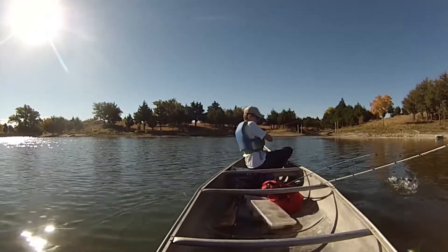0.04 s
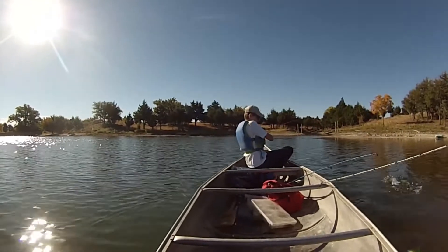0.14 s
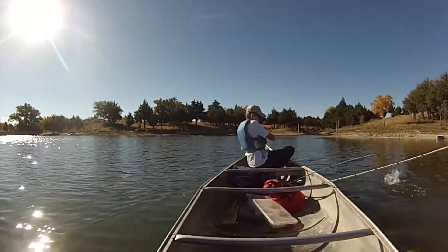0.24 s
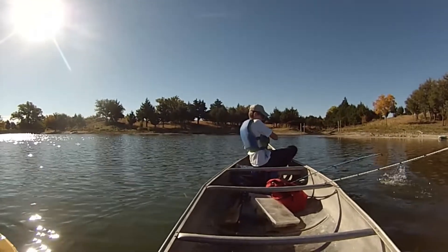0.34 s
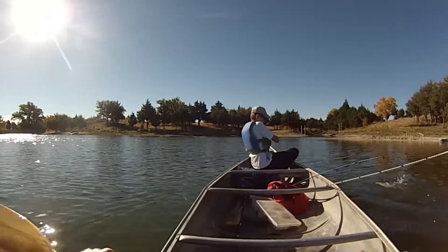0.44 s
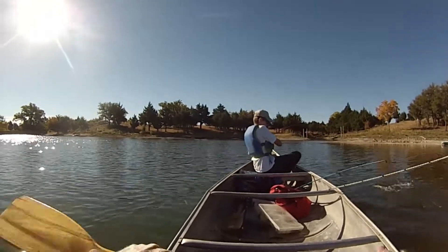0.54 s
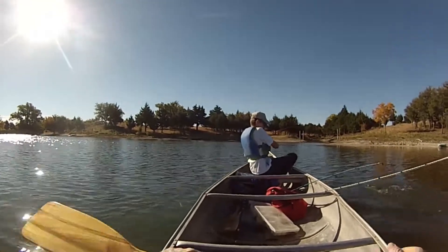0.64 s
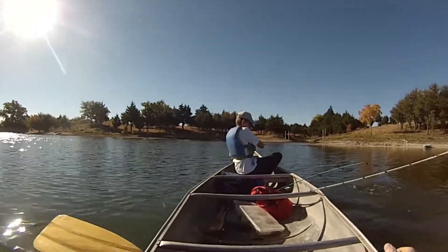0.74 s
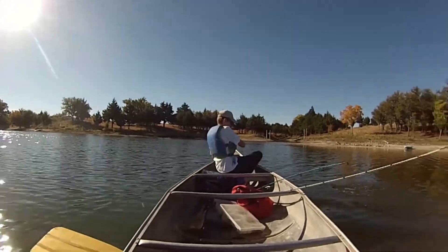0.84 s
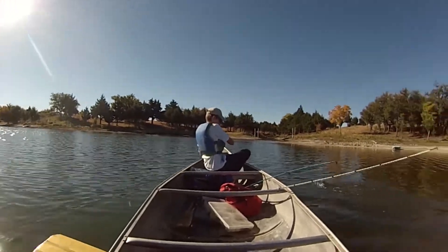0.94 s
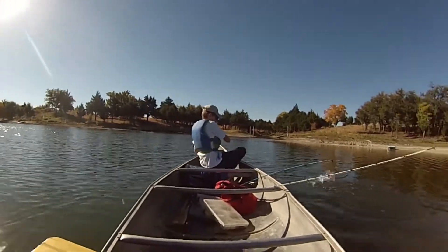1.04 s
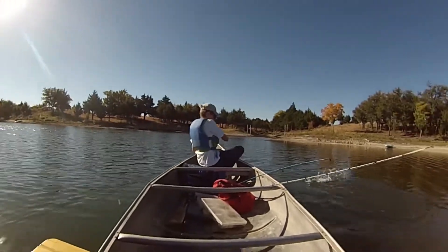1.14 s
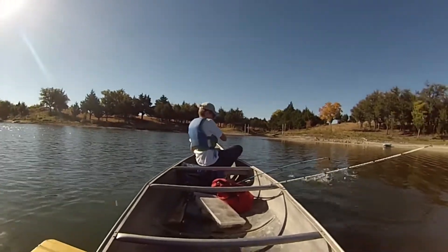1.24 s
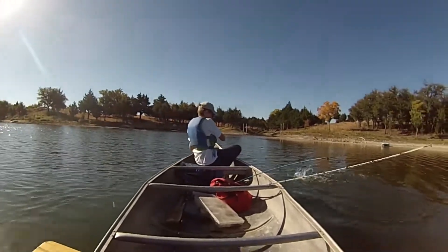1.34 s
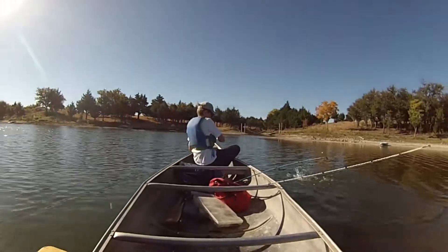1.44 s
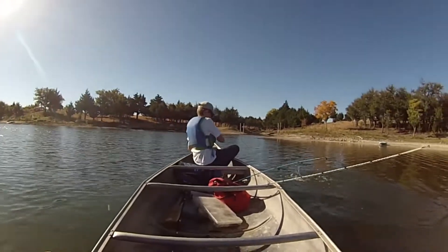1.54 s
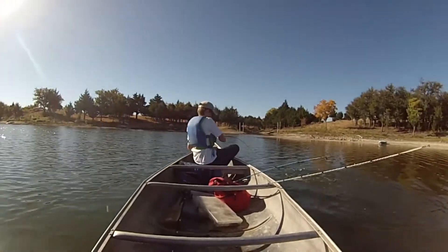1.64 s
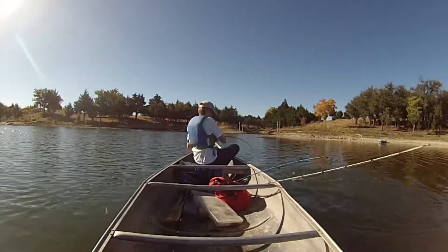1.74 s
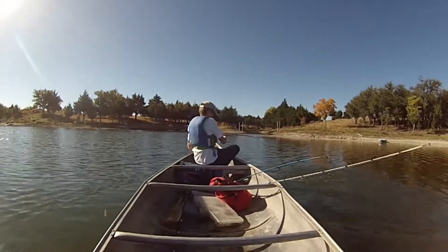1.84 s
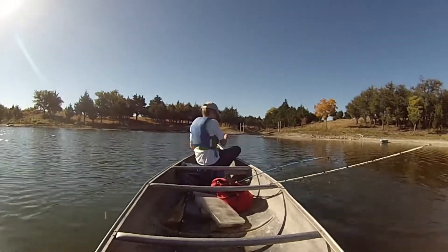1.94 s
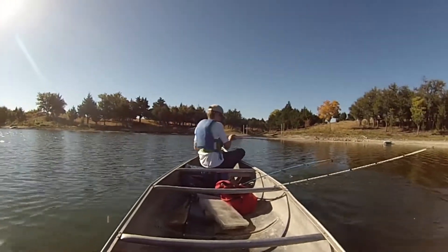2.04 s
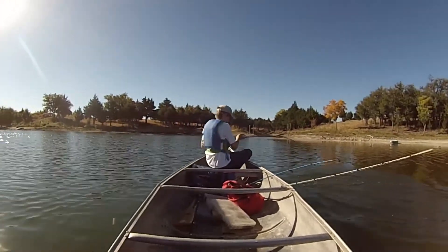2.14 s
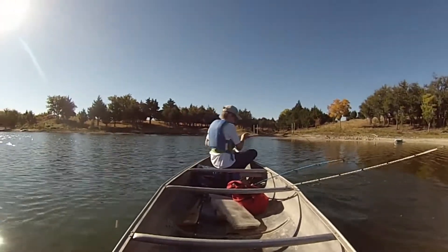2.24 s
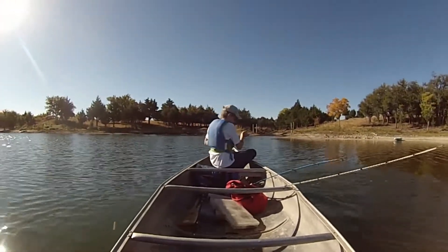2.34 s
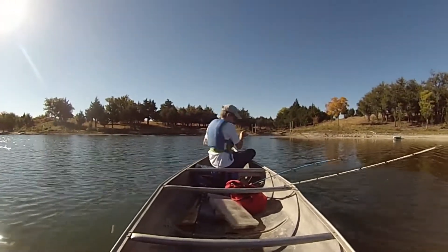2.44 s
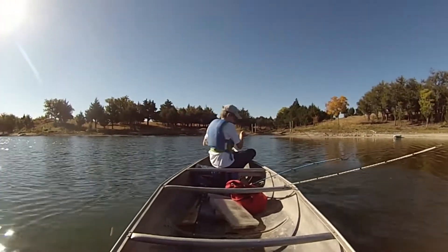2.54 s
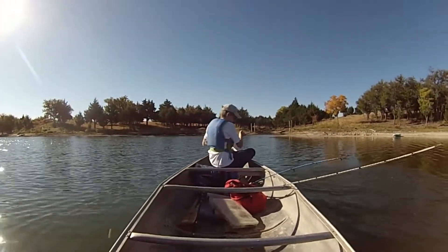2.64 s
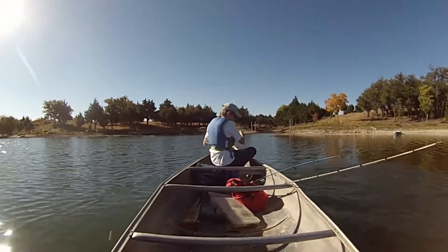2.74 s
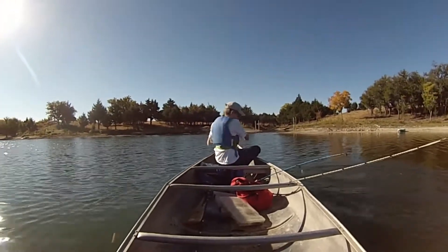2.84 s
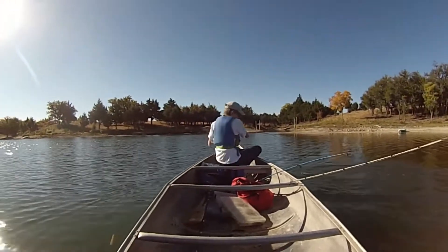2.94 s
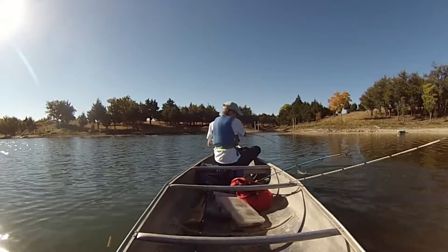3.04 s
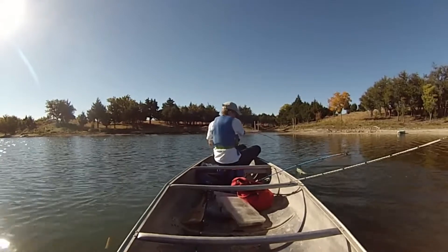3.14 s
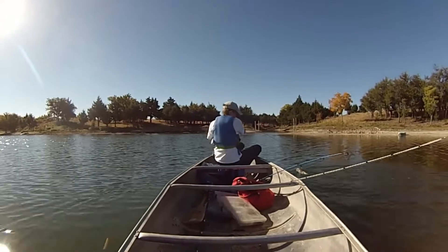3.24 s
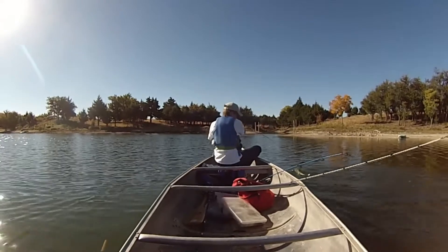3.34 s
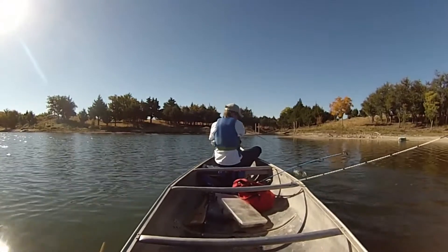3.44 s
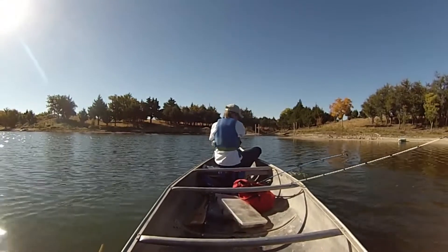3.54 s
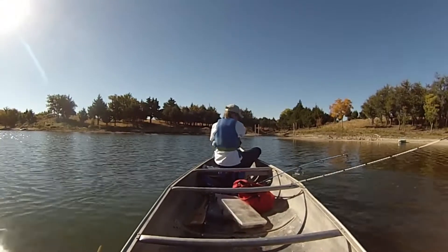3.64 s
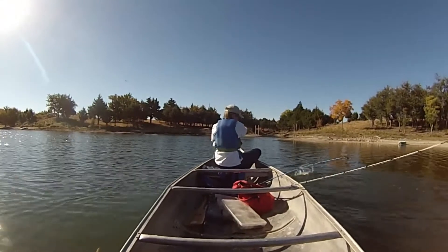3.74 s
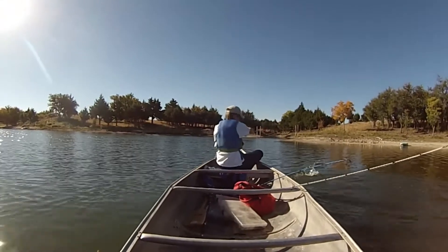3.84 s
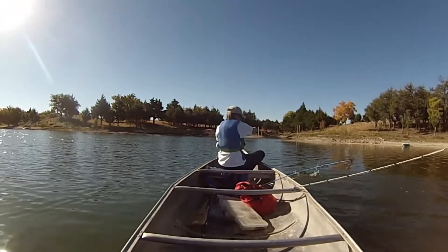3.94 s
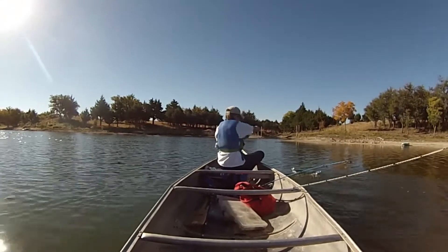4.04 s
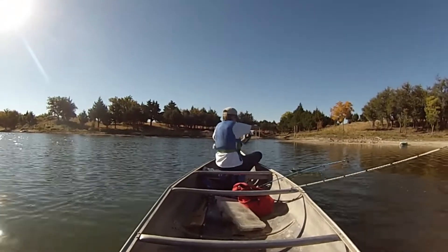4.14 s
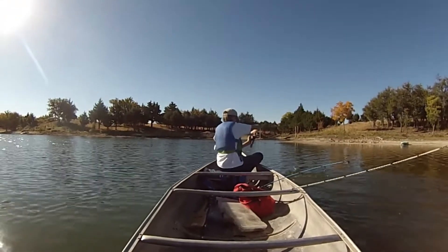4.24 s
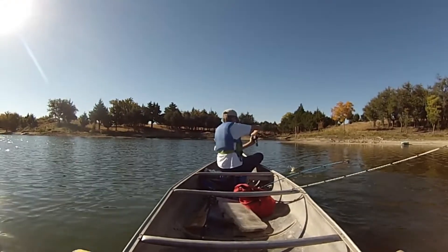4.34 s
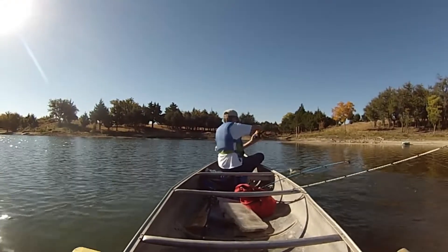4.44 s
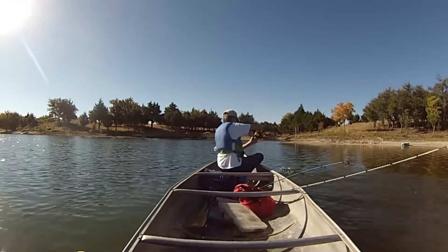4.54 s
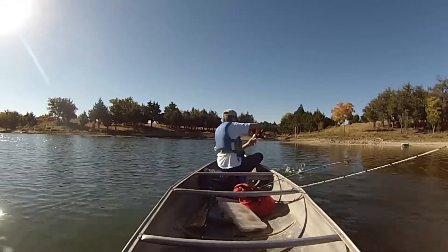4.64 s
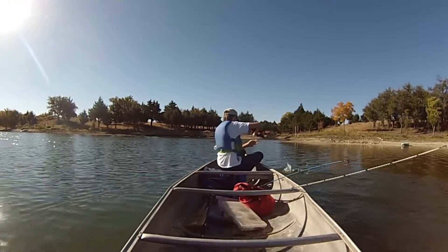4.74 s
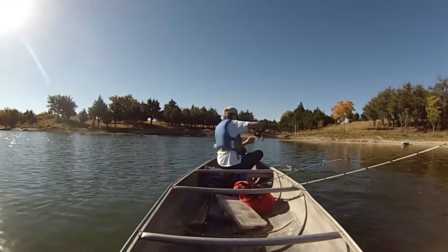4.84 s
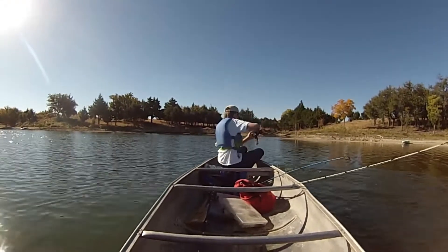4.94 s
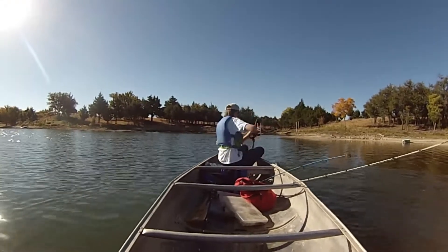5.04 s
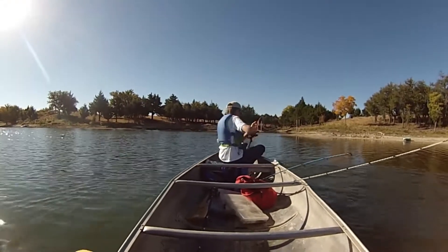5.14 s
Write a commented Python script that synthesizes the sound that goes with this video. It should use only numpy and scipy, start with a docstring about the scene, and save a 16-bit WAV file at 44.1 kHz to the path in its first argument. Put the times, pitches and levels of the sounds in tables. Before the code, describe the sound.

A hooked fish thrashes close by at the surface of a calm lake, beside a metal canoe. From 0 to about 1.6 s the splashing is dense: patchy spray, crisp ticks, plinking drops and gurgling bubbles, with a prominent hollow gulp near 1.15 s. Strong gusts overload the small microphone as deep lumpy thumps, heaviest between 0.6 and 1.1 s. A soft hull knock at 1.26 s precedes a hard, briefly ringing one at 1.6 s. A snappy plop comes at 1.9 s, then mostly faint lapping, sparse drips and low wind bumps, notably around 2.4 s. From 3.1 s small splashes return, growing after 3.4 s with rising bubbles and a bright snap near 3.77 s. Wind bumps return at 4.3 and 4.65 s; hull knocks sound around 4.55 and 4.78 s among renewed splashes. The sound is mono, dry and slightly boxy, over a faint steady wash.

```python
"""Calm lake, beside a sheet-metal canoe: a hooked fish thrashes at the surface.
Noise and damped sines make its spray, droplets, ticks and gulping bubbles; a late copy comes off the water.
Knocks ring the hull as decaying modes and noise. Gusts buffet the small camera's single microphone as
low noise and single pressure swings. The microphone sits in a housing; a faint wash lies underneath."""
import sys
import numpy as np
from scipy import signal
from scipy.fft import rfft, irfft, next_fast_len
from scipy.io import wavfile
from scipy.ndimage import uniform_filter1d, map_coordinates

SR = 44100
rng = np.random.default_rng(int(sys.argv[2]) if len(sys.argv) > 2 else 0)


def output_pcm(signal):
    """Save a mono or channel-first signal as 16-bit PCM at the path in sys.argv[1].

    Samples are clipped to [-1, 1] before scaling.
    """
    pcm = np.clip(np.atleast_2d(signal).T, -1, 1) * 32767
    wavfile.write(sys.argv[1], SR, np.round(pcm).astype(np.int16))


N = 228785


def amp(db):
    """Gain of a level in dB."""
    return 10 ** (np.asarray(db) / 20)


def unit(x):
    """Scaled to rms 1."""
    return x / np.sqrt(np.mean(x ** 2) + 1e-20)


def along(points, hz):
    """Interpolates (Hz, value) points on a log frequency axis."""
    point_hz, value = np.transpose(points)
    return np.interp(np.log(hz + 1), np.log(point_hz + 1), value)


def wobble(rate_hz):
    """A smooth random curve, rate_hz knots a second."""
    knots = rng.standard_normal(int(N * rate_hz / SR) + 4)
    return map_coordinates(knots, [np.arange(N) * rate_hz / SR])


def filtered(x, response):
    """x through a complex response of frequency, zero-padded."""
    m = next_fast_len(len(x) + SR // 2)
    return irfft(rfft(x, m) * response(np.fft.rfftfreq(m, 1 / SR)), m)[:len(x)]


def band(hz, low_hz, high_hz, steep):
    """Causal band-pass: first-order foot, top of order steep."""
    foot = 1j * hz / low_hz / (1 + 1j * hz / low_hz)
    return foot / (1 + 1j * hz / high_hz) ** steep


def add(out, start_s, sound):
    """Lays a sound into out from start_s on."""
    place = out[max(round(start_s * SR), 0):][:len(sound)]
    place += sound[:len(place)]


def swells(rows, rise_db_per_s, fall_db_per_s, rest_db, rest_above_db):
    """Gains of linked layers: each row rises, holds and falls at steady dB per second over a resting level."""
    t = np.arange(N) / SR

    def layers(above_db):
        return amp(2 * np.array([0, *above_db]))[:, None]

    power = amp(2 * rest_db) * layers(rest_above_db) * np.ones(N)
    for start_s, hold_s, db, *above_db in rows:
        rise = rise_db_per_s * np.maximum(start_s - t, 0)
        fall = fall_db_per_s * np.maximum(t - start_s - hold_s, 0)
        power = power + amp(2 * (db - rise - fall)) * layers(above_db)
    return np.sqrt(power)


def patches(depth_db):
    """White noise whose level differs from one small patch of time and pitch to the next."""
    z = signal.stft(rng.standard_normal(N), nperseg=128)[2]
    field = uniform_filter1d(rng.standard_normal(z.shape), size=5, axis=0)
    field = uniform_filter1d(field, size=5, axis=1)
    return signal.istft(z * amp(depth_db * unit(field)), nperseg=128)[1][:N]


def grains(count, mid_hz, octaves, cycles, spread_db):
    """Small bubbles at random moments: damped sines whose pitch rises a little."""
    draw = rng.standard_normal((count, 2))
    size = np.minimum(rng.exponential(1, (count, 1)), 3.5)
    start = rng.integers(0, N, (count, 1))
    hz = np.clip(mid_hz * 2 ** (octaves * draw[:, :1]), mid_hz / 2.6, SR / 3)
    span = np.arange(700)
    turn = hz * span / SR
    life = cycles * 2 ** (.5 * draw[:, 1:])  # cycles to die by 1/e
    tone = np.sin(2 * np.pi * turn * (1 + 0.0096 * turn / life))
    wave = tone * np.exp(-turn / life) * amp(spread_db * size)
    return unit(np.bincount((start + span).ravel(), wave.ravel(), minlength=N)[:N])


def churn():
    """Spray is patchy hiss, fizz, plinks, spatter and crackle; below it middling bubbles gurgle."""
    # Thrashes of the fish. Each row: start in seconds, hold in seconds, spray level in dB,
    # gurgle above it in dB, fine spatter above it in dB; the mix below trims each layer.
    thrashes = [(0, 0.07, -50, 6, -10.5), (.14, 0.23, -50.5, 2, -6), (.46, 0.59, -50.5, 0, -11.5),
                (1.03, 0.032, -49, -8, -8), (1.14, 0.26, -45.5, 1.5, -9), (1.5, 0.073, -52, -1, -10.5),
                (1.92, 0.3, -62, 2, -10), (2.84, 0.065, -59, 3.5, -15), (3.1, 0.16, -62, -12, -12),
                (3.43, 0.024, -59.5, 9, -10), (3.59, 0.071, -54.5, 0, -18), (3.76, 0.026, -57, -10, -5.5),
                (3.88, 0.13, -57.5, -10, -13.5), (4.26, 0.11, -59.5, 4, -10.5), (4.47, .02, -60, -10, -12),
                (4.555, 0.12, -52, -0.5, -14.5), (4.765, 0.13, -59, 2.5, -11.5)]
    # Between the thrashes: gurgle and spatter above the lapping, in dB.
    lapping_above_db = [4, -11]
    # Colour of the spray. Each row: frequency in Hz, relative density in dB per Hz.
    spray_colour = [(400, -16), (900, -2), (1300, -3.5), (2500, -6.5), (5300, -31), (9000, -21),
                    (15500, -31)]
    # Single plinks step forward once the fish tires. Each row: time in seconds, level in the spray in dB.
    plink_levels = [(2.9, -14.5), (3.1, -6.5)]
    spray, depth, mist = swells(thrashes, rise_db_per_s=159, fall_db_per_s=133,
                                rest_db=-65, rest_above_db=lapping_above_db)

    def colour(hz):
        return amp(along(spray_colour, hz))

    hiss = unit(filtered(patches(depth_db=1.5) * amp(0.46 * wobble(70)), colour))
    fizz = grains(count=6000, mid_hz=3622, octaves=0.605, cycles=4.0, spread_db=3.5)
    fizz = unit(filtered(fizz, colour))
    plinks = grains(count=1800, mid_hz=2900, octaves=0.554, cycles=5.7, spread_db=3.2)
    plinks = unit(plinks * amp(4.6 * wobble(22.05)))
    spatter = grains(count=14000, mid_hz=6320, octaves=.6, cycles=7.0, spread_db=4.0)
    spatter = unit(spatter * amp(1.95 * wobble(9.1)))
    crackle = grains(count=1500, mid_hz=4700, octaves=0.63, cycles=0.76, spread_db=4.5)
    crackle = unit(crackle * amp(6.1 * wobble(14)))
    gurgle = grains(count=1800, mid_hz=627.5, octaves=0.329, cycles=4.0, spread_db=2.0)
    gurgle = unit(filtered(gurgle, lambda f: band(f, 215, 1100, 2.55)))

    plink_db = np.interp(np.arange(N) / SR, *np.transpose(plink_levels))
    coarse = amp(-7) * hiss + amp(-10.0) * fizz + amp(plink_db) * plinks
    fine = spatter + amp(-6.5) * crackle
    return spray * coarse + mist * fine + amp(-3.0) * depth * gurgle


def droplets():
    """Each drop plinks at its own pitch, throws off five smaller bubbles and sizzles more or less on top."""
    # Drops that snap on the surface. Each row: start in seconds, level in dB before drop_db,
    # pitch in Hz, sizzle above the body in dB before sizzle_trim_db.
    drops = [(0.0476, -33, 2240, -38), (0.1086, -43, 2100, -32), (0.175, -40, 1910, -10),
             (0.196, -36.5, 2530, -9), (0.271, -38.5, 3920, -24), (0.3092, -38.5, 3900, -16),
             (0.369, -43, 4000, -30), (0.381, -33, 1510, -18), (0.407, -36.5, 2110, -35),
             (0.58, -50.5, 2040, 1), (0.7405, -36, 1390, -12.5), (0.9124, -32, 3030, -8),
             (0.934, -34, 1840, -7.5), (1.0127, -35.5, 1350, -19), (1.0196, -46, 3300, -1),
             (1.062, -42, 3560, -13), (1.102, -33, 2040, -30), (1.132, -35, 1620, -32),
             (1.166, -33, 2800, -34), (1.24, -29.5, 1810, -30), (1.3125, -41, 2040, -35),
             (1.356, -35, 1470, -27), (1.363, -32.5, 2830, -3), (1.3737, -33.5, 2800, -4),
             (1.3957, -34, 1870, -11), (1.4106, -33.5, 3130, -17), (1.4406, -38, 3280, -9),
             (1.518, -34.5, 2770, -16), (1.674, -38, 2020, -11), (1.835, -62, 1460, 5),
             (1.906, -33.5, 4005, -49), (1.999, -47.5, 4400, -7), (2.0558, -50, 1420, -3.5),
             (2.443, -56, 1570, 1), (2.7196, -49, 4840, -10), (3.162, -50, 2600, -28),
             (3.2185, -44, 4000, -35), (3.3267, -46.5, 3480, -25), (3.472, -57.5, 2200, 3.5),
             (3.49, -53, 1380, 1.5), (3.572, -34, 1300, -38), (3.6105, -37, 2100, -34),
             (3.6382, -37.5, 2010, -30), (3.6671, -50, 4500, -5), (3.7525, -33.5, 2050, -24),
             (3.759, -35, 1820, -5.5), (3.77, -30, 1840, -5.5), (3.783, -41, 1650, -28),
             (3.8918, -40, 1840, -12.5), (3.92, -43, 3200, -9), (3.962, -39, 3530, -37),
             (4.123, -49, 1800, -3), (4.3112, -41.5, 1980, -47), (4.465, -41, 3560, -9),
             (4.485, -36.5, 2800, -15), (4.5985, -35, 1730, -43), (4.621, -52, 3520, -22),
             (4.6382, -34.5, 1960, -41), (4.688, -41.5, 4000, -20), (4.748, -38.5, 1970, -10),
             (4.817, -48, 3000, -10), (4.8842, -36.5, 1980, -32), (4.899, -40, 1730, -5)]
    drop_db, sizzle_trim_db = -4, 11
    out, t = np.zeros(N), np.arange(SR // 25) / SR
    puff_t60_s = np.array([[.022], [.011]])  # plink, sizzle
    for start_s, db, hz, sizzle_db in drops:
        puff = rng.standard_normal((2, len(t))) * amp(-60 * t / puff_t60_s) * (1 - np.exp(-t / 0.0005))
        # resonance of Q 5 at the drop's pitch
        plink = filtered(puff[0], lambda f: 1j * f * hz / 5 / (hz * hz - f * f + 1j * f * hz / 5))
        delay, rise, size = rng.random((3, 5, 1))
        age_s = np.maximum(t - .012 * delay ** 2, 0)
        cycles = age_s * np.minimum(hz * 2 ** (2.22 * rise - .4), SR / 3)
        spatter_gain = amp(-9 * rise - 4.7 * size - 60 * cycles / 45)
        spatter = np.sum(spatter_gain * np.sin(2 * np.pi * cycles), axis=0)
        body = plink / np.abs(plink).max() + amp(-4.0) * spatter
        body = body / np.abs(body).max()
        sizzle = filtered(puff[1], lambda f: band(f, 5700, 11900, 2.5) ** 2)
        sizzle = sizzle / np.abs(sizzle).max()
        add(out, start_s, amp(db + drop_db) * (body + amp(sizzle_db + sizzle_trim_db) * sizzle))
    return out


def ticks():
    """Each tick of fine spatter is a tiny bubble that starts at once and is gone in a few cycles."""
    # Each row: start in seconds, level in dB, pitch in Hz.
    tick_rows = [(0.017, -41, 3500), (0.1246, -28.5, 3600), (.142, -33, 4400), (0.151, -34, 5200),
                 (.177, -35, 5300), (.213, -37, 4900), (0.282, -43, 7040), (.382, -34.5, 3960),
                 (.389, -42, 7300), (1.103, -26, 2670), (1.232, -31, 3250), (1.321, -24.5, 1900),
                 (1.9077, -26, 2410), (3.128, -44, 3930), (3.274, -46, 3200), (3.433, -34.5, 2600),
                 (3.443, -43, 3200), (3.506, -33.5, 1330), (3.7692, -25.5, 3700), (4.217, -35.5, 2150),
                 (4.388, -41, 2450), (4.543, -34.5, 3260), (4.571, -33, 2500), (4.64, -30.5, 2750),
                 (4.712, -43, 3100), (4.768, -42, 3200), (4.778, -23, 1660), (4.892, -35, 2930)]
    life_s = 0.00066  # to die by 1/e
    out, t = np.zeros(N), np.arange(SR // 100) / SR
    for start_s, db, hz in tick_rows:
        turn = hz * t
        envelope = 1.6 * (1 - np.exp(-turn)) ** 2 * np.exp(-t / life_s)
        tone = np.sin(2 * np.pi * turn + rng.uniform(0, 2 * np.pi))
        add(out, start_s, amp(db) * envelope * tone)
    return out


def bubbles():
    """Each bubble, small or large, rings at a trembling pitch that holds or glides; one is a bare click."""
    # Each row: start in seconds, level in dB, start pitch in Hz, end pitch in Hz, length scale in seconds.
    bubble_rows = [(0.049, -34, 710, 627, 0.0073), (0.052, -39, 362.7, 349, 0.021),
                   (0.147, -38, 2000, 1880, 0.0042), (0.159, -41, 825, 747, 0.025),
                   (0.231, -39, 297, 355, 0.027), (0.38, -30, 563, 512, 0.026),
                   (0.585, -42, 745, 720, 0.0078), (0.84, -40.5, 590, 630, 0.015),
                   (0.914, -27, 620, 576, 0.0057), (0.934, -28.5, 600, 610, 0.0065),
                   (1.04, -41, 6800, 7100, 0.0082), (1.131, -33.5, 620, 720, 0.0078),
                   (1.149, -18.5, 508, 485, .013), (1.164, -33, 1360, 1410, 0.0024),
                   (1.238, -38, 600, 605, 0.018), (1.29, -41.5, 696, 660, 0.028),
                   (1.397, -46, 650, 630, 0.012), (1.519, -45, 1120, 1180, 0.0089),
                   (1.909, -28.5, 520, 520, 0.00087), (3.064, -47, 2030, 2100, 0.0087),
                   (3.09, -56.5, 1600, 1700, .012), (3.244, -48.5, 1940, 1880, 0.0077),
                   (3.4, -52, 3040, 3220, 0.0061), (3.412, -39.5, 240, 324, 0.021),
                   (3.441, -31, 503, 700, 0.0082), (3.496, -45, 300, 324, 0.026),
                   (3.511, -48, 442, 620, 0.016), (3.563, -35, 524, 846, 0.025),
                   (3.575, -47, 6360, 6460, 0.0041), (3.601, -39.5, 590, 580, 0.012),
                   (3.63, -50, 1770, 1860, 0.0074), (3.655, -57, 1700, 2000, 0.0078),
                   (3.696, -44, 716, 704, 0.032), (3.706, -41.5, 360, 738, 0.041),
                   (3.758, -43.5, 537, 790, 0.014), (3.869, -45.5, 487, 760, 0.035),
                   (4.006, -41.5, 2000, 4100, 0.0063), (4.105, -46.5, 1150, 1700, 0.013),
                   (4.226, -40, 536, 508, 0.018), (4.563, -42, 1350, 1330, 0.016),
                   (4.58, -44, 1840, 2090, 0.01), (4.666, -47, 1600, 2000, 0.014),
                   (4.859, -41.5, 686, 755, 0.018)]
    waver = 0.021  # rms share of the pitch at each knot, four knots a length
    out, t = np.zeros(N), np.arange(SR // 8) / SR
    for start_s, db, start_hz, end_hz, length_s in bubble_rows:
        u = t / length_s
        swell = 2.6 * u ** .6 * np.exp(-2.5 * u ** 1.7)
        hz = start_hz + (end_hz - start_hz) * np.minimum(u, 1.5)
        hz = hz * (1 + waver * np.interp(u, np.arange(40) / 4, rng.standard_normal(40)))
        add(out, start_s, amp(db) * swell * np.sin(2 * np.pi * np.cumsum(hz) / SR))
    return out


def mirrored(x):
    """The splash also arrives off the water, a little late; the two comb the spectrum as the delay drifts."""
    # Each row: time in seconds, delay in ms, share of the direct sound (ratio).
    reflection = [(0.43, 0.52, 0.24), (0.5, 0.59, 0.15), (0.98, 0.59, 0.24), (1.05, 0.614, 0.32),
                  (3.4, 0.6, 0.33)]
    at_s, delay_ms, share = np.transpose(reflection)
    t = np.arange(N) / SR
    late = map_coordinates(x, [(t - np.interp(t, at_s, delay_ms) / 1000) * SR], order=5)
    return x + np.interp(t, at_s, share) * late


def hull():
    """Each knock rings the sheet at new strengths; a soft blow misses the upper modes."""
    # Each row: start in seconds, strength in dB, hardness 0-1.
    knocks = [(1.259, -31.5, 0.12), (1.597, -19.5, 0.96), (1.622, -25, 0.07), (3.573, -38.5, 0.54),
              (4.542, -27, 0.76), (4.57, -30, 0.3), (4.7764, -24.5, 0.36)]
    # Hull modes. Each row: frequency in Hz, mean level in dB, t60 in seconds.
    modes = [(175.5, 1, 0.29), (199.2, 0, 0.34), (266, -6.5, 0.076), (331, 10, 0.046), (368, -8, 0.29),
             (425, 2.5, 0.11), (483.5, -1, 0.17), (587, 5.5, 0.061), (1320, -12.5, 0.13)]
    # Dense clang of the sheet as noise, strongest near 200 Hz.
    # Each row: frequency in Hz, relative density in dB per Hz.
    clang_colour = [(70, -49), (130, -0.5), (193, 11), (505, -2.5), (1000, -4.5), (3000, -16.5),
                    (9000, -40)]
    # Its decay. Each row: frequency in Hz, t60 in seconds.
    clang_decay = [(150, 0.65), (700, 0.24), (1840, 0.11), (4850, 0.17)]
    out, t = np.zeros(N), np.arange(SR // 2) / SR
    for start_s, db, hard in knocks:
        ring = np.zeros(len(t))
        for mode_hz, level_db, t60_s in modes:
            gain = amp(level_db + rng.normal(0, 3.5) - 60 * t / t60_s)
            ring += gain * np.sin(2 * np.pi * mode_hz * t + rng.normal(0, 0.9))
        ring *= 1 - np.exp(-t / 0.0044)
        hz, when_s, z = signal.stft(rng.standard_normal(len(t)), SR, nperseg=256)
        decay_db = 60 * when_s / along(clang_decay, hz)[:, None]
        z = z * amp(along(clang_colour, hz)[:, None] - decay_db)
        clang = signal.istft(z, SR, nperseg=256)[1][:len(t)]
        clang = clang / np.std(clang[:1000])
        thud = np.sin(2 * np.pi * 380 * t) * amp(-60 * t / 0.025)  # the sheet dents under the blow
        crack = np.sin(2 * np.pi * 4300 * t) * amp(-60 * t / 0.019)  # the edge that is hit
        blow = amp(-2.5) * thud + amp(-9.5) * crack + amp(-4.5) * ring + amp(-8.0) * clang
        top_hz = 150 * 45 ** hard
        add(out, start_s, amp(db) * filtered(blow, lambda f: 1 / (1 + 1j * f / top_hz) ** 2))
    return out


def wind():
    """Lumpy turbulence in two sizes of eddy, and the strongest eddies one by one."""
    # Gusts on the microphone port. Each row: start in seconds, hold in seconds, buffet level in dB,
    # flutter above it in dB before a trim of -5 dB.
    gusts = [(0, 0.24, -46, -1), (.32, 0.058, -33.5, -6.5), (.42, 0.34, -31.5, -0.5),
             (.872, 0.071, -29, 0.5), (.95, 0.18, -31, 0.5), (1.15, 0.079, -43.5, -24),
             (1.72, 0.11, -42.5, 5.5), (1.92, 0.17, -51, -9), (2.2, 0.16, -43, -17),
             (2.33, 0.067, -35.5, 1.5), (2.42, 0.11, -36, -13), (2.66, 0.061, -42.5, -9.5),
             (2.96, 0.082, -46, -28), (3.3, 0.12, -55, 5), (3.59, 0.084, -37, -27),
             (3.73, 0.22, -41.5, -30), (4.02, 0.019, -42, -25), (4.24, 0.14, -36, -8),
             (4.42, 0.04, -41.5, -19), (4.59, 0.14, -35.5, -12), (4.82, 0.31, -36, -23)]
    # Between the gusts: flutter above the breeze, in dB before the same trim.
    breeze_above_db = [-2]
    # Single strong eddies that pop on the port. Each row: centre in seconds, peak in dB, frequency in Hz.
    eddies = [(0.477, -23, 182), (0.536, -27, 93), (0.575, -20, 176), (0.648, -13.5, 143),
              (0.738, -8.5, 198), (0.888, -8, 84), (0.901, -10.5, 187), (0.918, -14.5, 166),
              (0.96, -23, 153), (1.014, -12, 174), (1.044, -18, 230), (1.091, -16, 156),
              (2.366, -21.5, 188), (2.361, -35.5, 427), (2.366, -44, 650), (2.607, -39, 322),
              (2.54, -33.5, 73.5), (4.263, -21, 61), (4.297, -22, 130), (4.335, -21, 72),
              (4.621, -25.5, 75), (4.66, -21, 70), (4.721, -22, 97), (5.003, -27, 122)]
    buffet, flutter = swells(gusts, rise_db_per_s=408, fall_db_per_s=348,
                             rest_db=-51.5, rest_above_db=breeze_above_db)
    lumps = wobble(45)
    slow = rng.standard_normal(N) * amp(0.48 * lumps)
    slow = filtered(slow, lambda f: band(f, 20, 103.3, 3.04))
    quick = rng.standard_normal(N) * amp(13.7 * np.tanh(0.41 * lumps + 0.5 * wobble(90)))
    quick = filtered(quick, lambda f: band(f, 177, 322, 6.06))
    out = buffet * unit(slow) + amp(-5.0) * flutter * unit(quick)
    t = np.arange(-1323, 1323) / SR
    for centre_s, db, hz in eddies:
        cycles = 0.5 - 0.02 * db  # a weaker eddy swings longer
        envelope = np.exp(-2.2 * np.abs(t * hz / cycles) ** 1.5)
        # a pressure dip between two shoulders
        add(out, centre_s + t[0], -amp(db) * np.cos(2 * np.pi * hz * t) * envelope)
    return out


def air():
    """Far shore and ripples: a faint wash of coloured noise, nearly steady."""
    # Each row: frequency in Hz, relative density in dB per Hz.
    wash_colour = [(88, 0), (150, -7.5), (314, -3.5), (643, -12), (1000, -13.5), (1730, -18.5), (6860, -26),
                   (12800, -31), (15500, -32)]
    wash = filtered(rng.standard_normal(N), lambda f: amp(along(wash_colour, f)))
    level_db = -58 + 0.67 * wobble(2.98)
    return amp(level_db) * unit(wash)


def scene():
    """Everything reaches one microphone."""
    splash = mirrored(churn() + droplets() + ticks() + bubbles())
    return (splash + hull() + wind() + air())[None]


def record(dry):
    """The housing colours the sound and dulls the very top; the camera keeps nothing above its band limit."""
    # Housing colour. Each row: centre in Hz, width in Hz, gain in dB; the last softens the top edge.
    housing_bands = [(696, 330, 3.5), (2020, 220, 0), (3720, 1450, 2), (15800, 600, -12)]
    top_hz = 15730

    def response(hz):
        gain_db = sum(db / (1 + (2 * (hz - centre_hz) / width_hz) ** 2)
                      for centre_hz, width_hz, db in housing_bands)
        return amp(gain_db) * band(hz, 10.4, 11000, 1) * (hz < top_hz)

    return filtered(dry[0], response)[None]


dry = scene()
out = record(dry)
output_pcm(out)
```